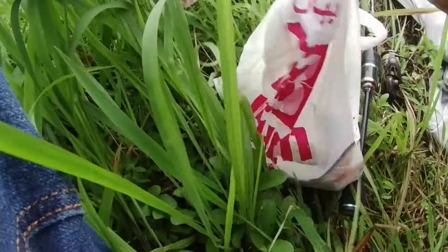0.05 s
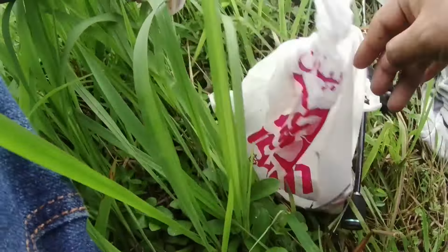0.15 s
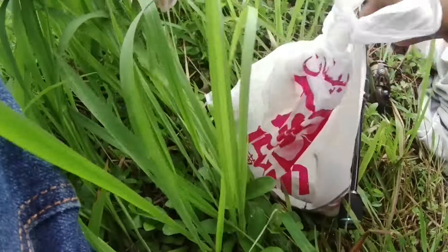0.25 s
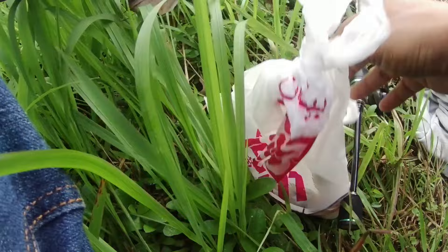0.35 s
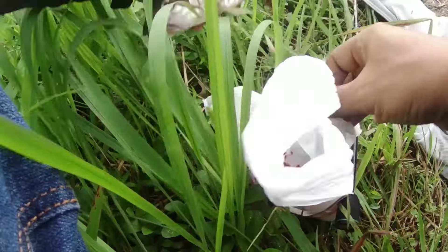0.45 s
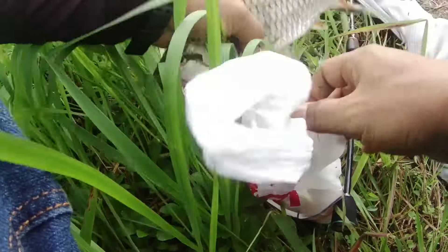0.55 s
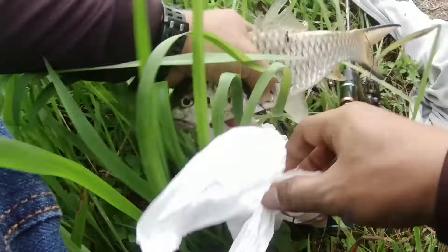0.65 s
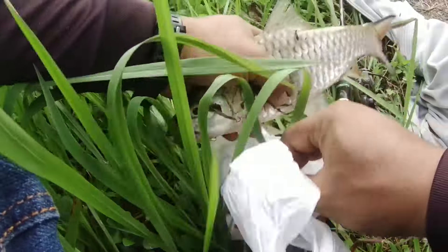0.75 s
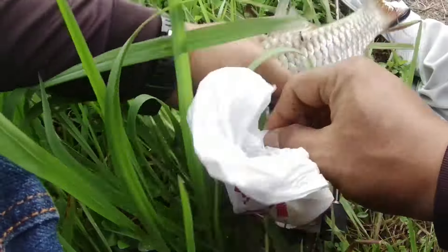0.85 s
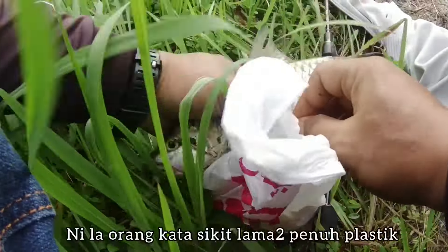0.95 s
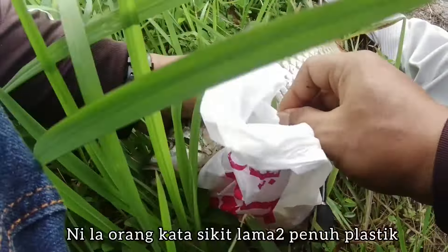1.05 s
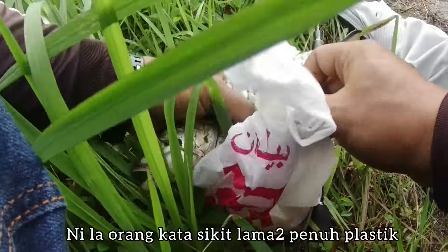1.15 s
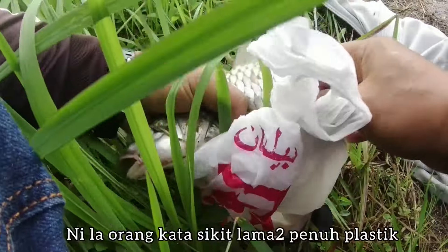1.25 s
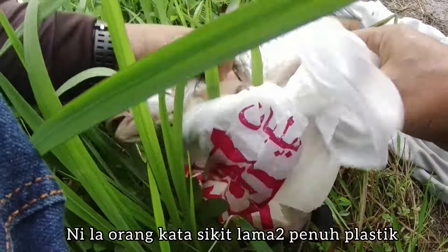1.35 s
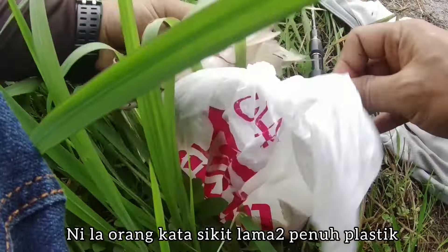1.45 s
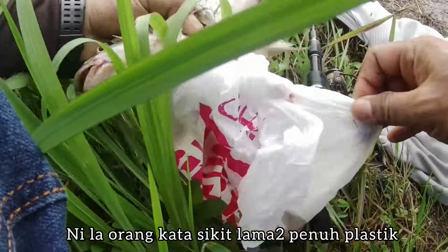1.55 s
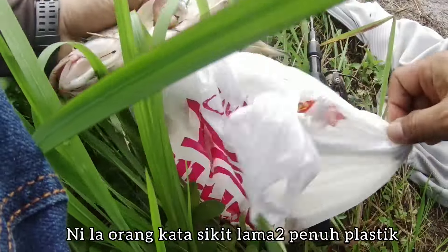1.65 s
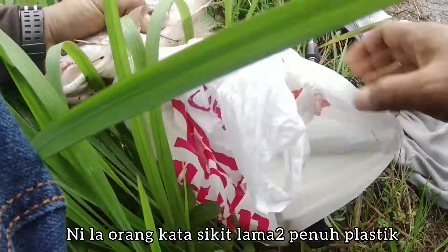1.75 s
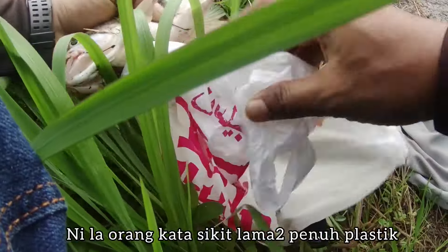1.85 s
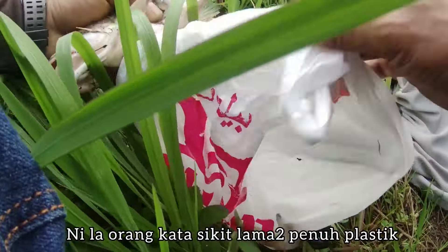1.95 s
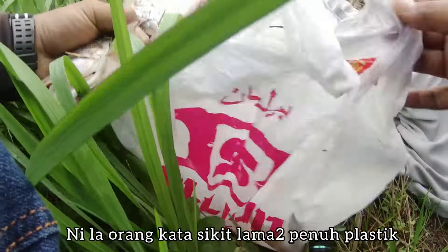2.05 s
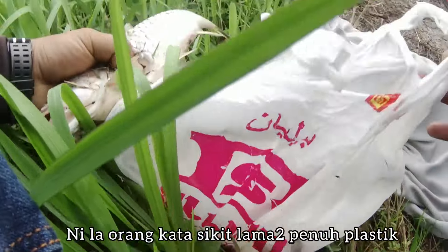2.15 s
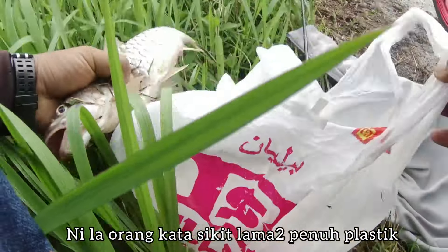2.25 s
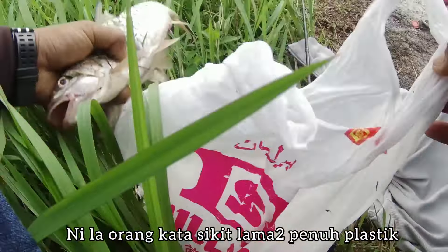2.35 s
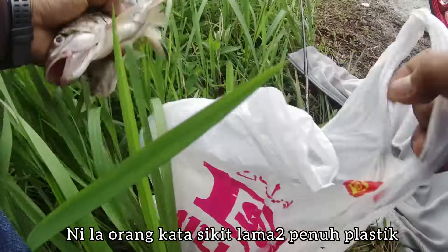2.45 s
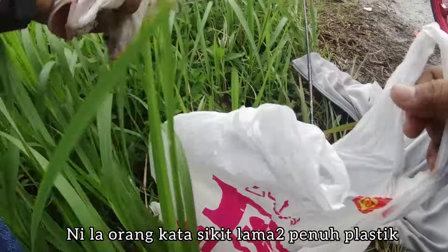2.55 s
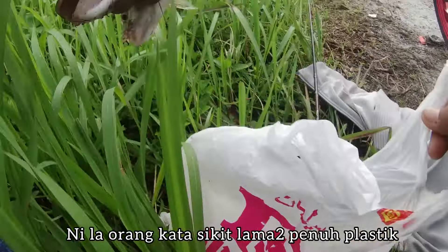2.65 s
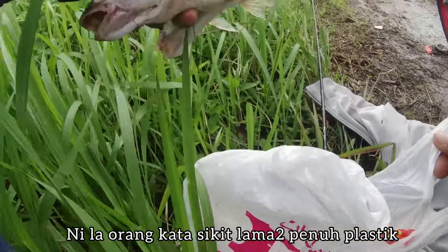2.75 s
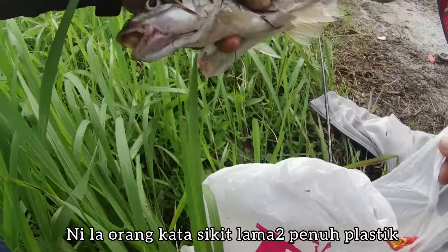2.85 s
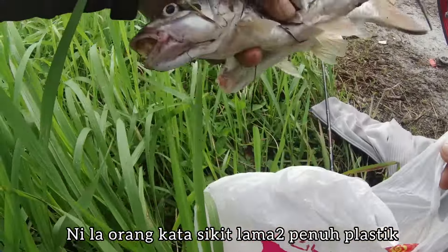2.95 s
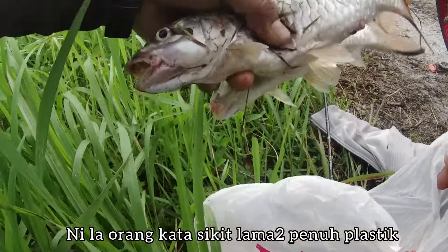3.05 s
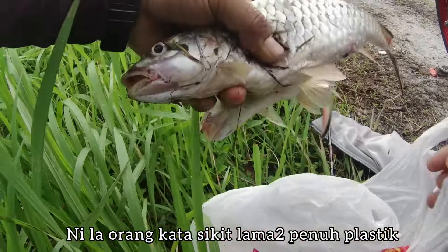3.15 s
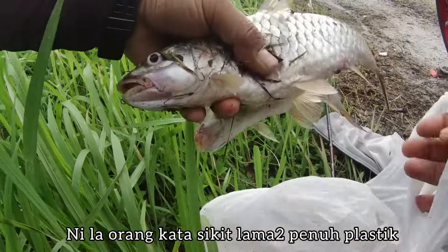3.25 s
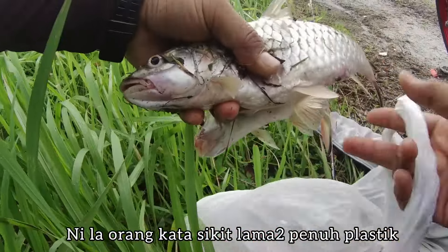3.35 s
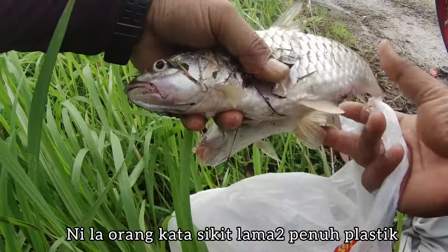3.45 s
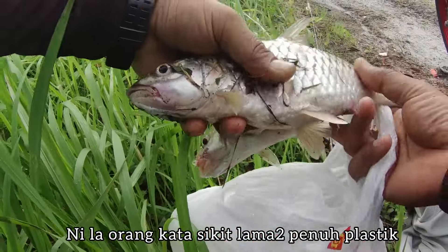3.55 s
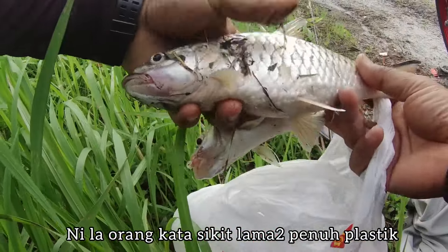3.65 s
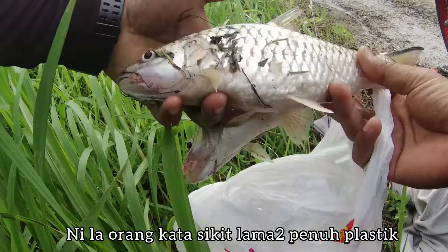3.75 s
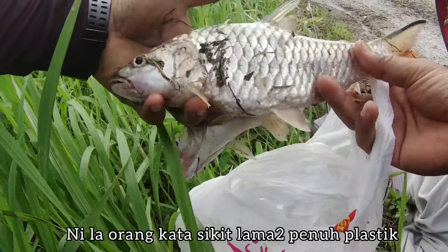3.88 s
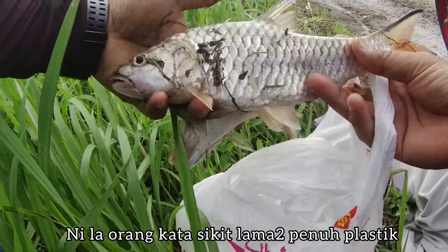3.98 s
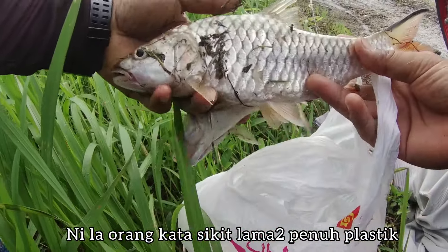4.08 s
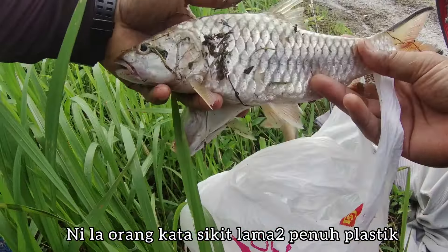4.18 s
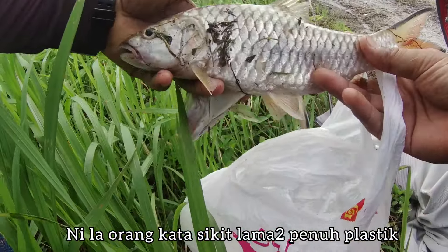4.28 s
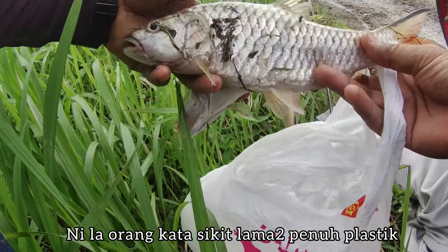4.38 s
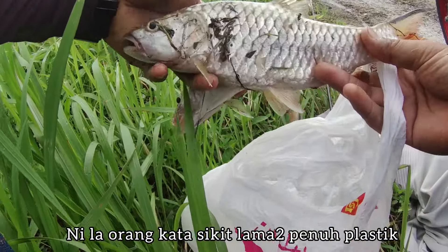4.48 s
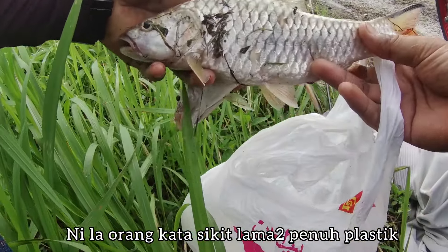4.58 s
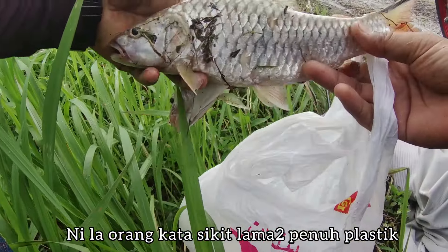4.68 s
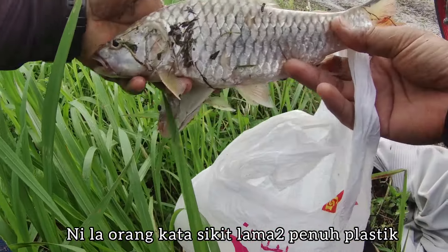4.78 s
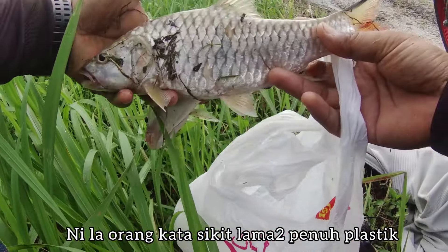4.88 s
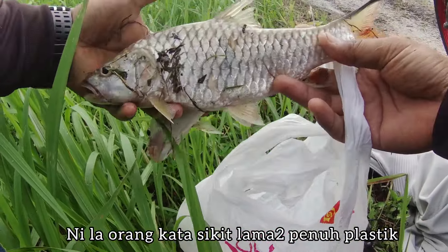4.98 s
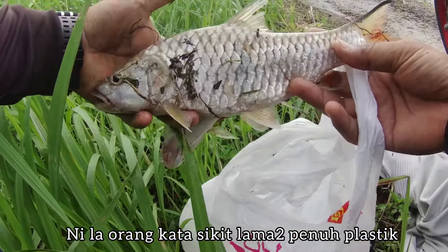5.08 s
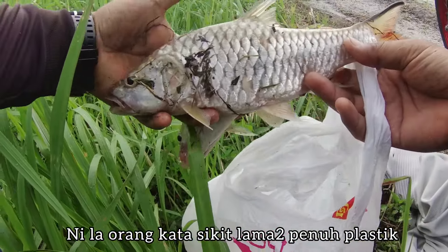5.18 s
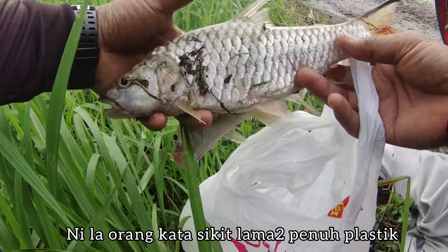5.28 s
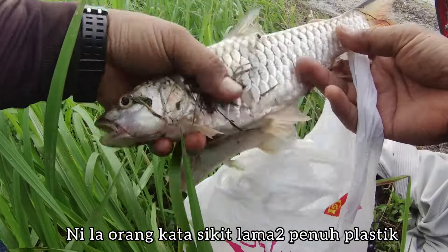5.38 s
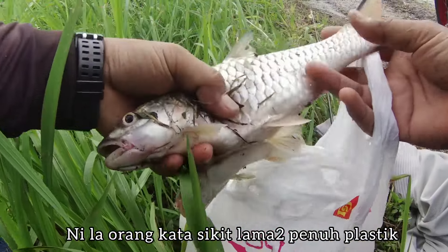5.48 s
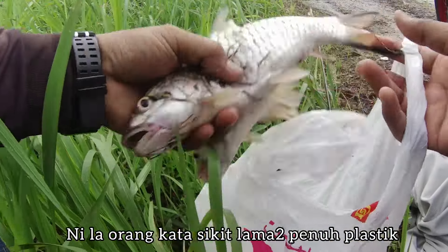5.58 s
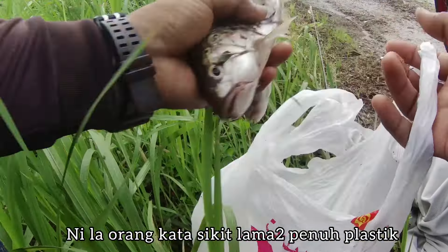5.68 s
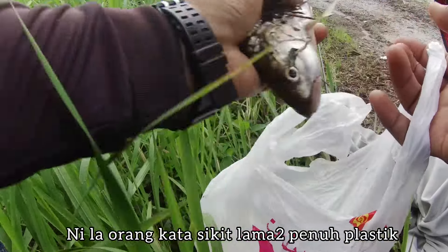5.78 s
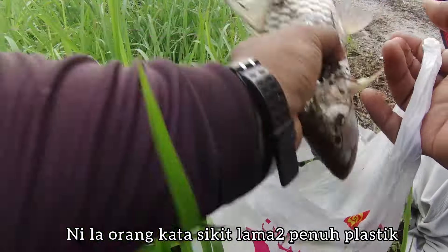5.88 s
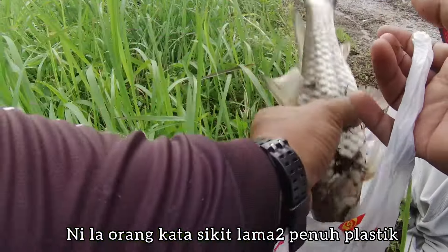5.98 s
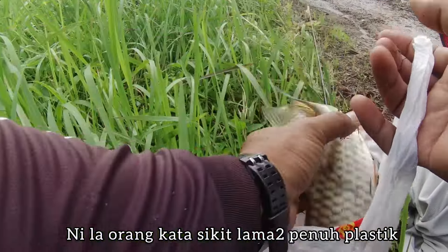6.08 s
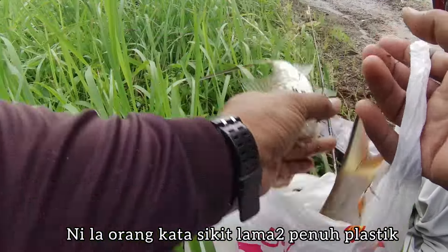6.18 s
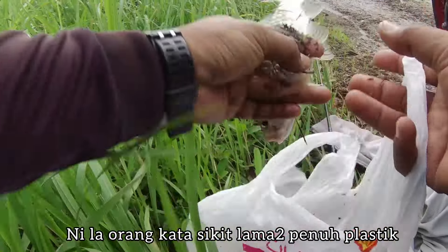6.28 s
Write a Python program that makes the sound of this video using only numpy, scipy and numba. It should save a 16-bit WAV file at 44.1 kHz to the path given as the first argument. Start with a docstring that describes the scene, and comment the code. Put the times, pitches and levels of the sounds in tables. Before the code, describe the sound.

Close bursts of crinkling plastic ease into light crackles outdoors, with a motorbike going by and a faint squeaky bird.

```python
"""A plastic bag in the grass

A thin plastic bag is pulled open and handled close by, then held almost still. Tiny creases
buckle by the thousand, which makes the rustle, and a few snap on their own. Behind it a motorbike
passes with a humming exhaust and roaring tyres, a bird squeaks, and the next vehicle draws near."""
import sys
import numpy as np
from scipy import signal
from scipy.fft import rfft, irfft
from scipy.io import wavfile
from scipy.ndimage import uniform_filter1d
from numba import njit

SR = 44100
rng = np.random.default_rng(int(sys.argv[2]) if len(sys.argv) > 2 else 0)


def master(y):
    """Save y as 16-bit WAV."""
    cut = np.clip(np.atleast_2d(y).T, -1, 1)
    pcm = np.round(cut * 32767)  # scale
    wavfile.write(sys.argv[1], SR, pcm.astype(np.int16))


N = 279108
TIME = np.arange(N) / SR

# tone colour of the crinkling plastic film: f/Hz, level/dB
FILM_COLOUR = [(500, -46), (1100, -34), (1500, -33), (2000, -8.5), (2700, -11.5), (3600, -10.5),
               (4800, -9.5), (6500, -7), (8200, -4.5), (9700, 0.5), (11000, -1.5), (13000, -5.5),
               (14500, -10), (15600, -14)]


def undb(db):
    """Turn decibels into a factor to multiply a sound by."""
    return 10 ** (np.asarray(db) / 20)


def unit(x):
    """Scale a sound to an average power of 1."""
    return x / np.sqrt(np.mean(x ** 2))


def colour(x, points):
    """Give a sound the tone colour drawn by points (f/Hz, level/dB); white noise keeps its power."""
    size = 4096
    hz, db = np.transpose(points)
    log_hz = np.log(np.fft.rfftfreq(size, 1 / SR) + 1)
    log_gain = np.log(undb(np.interp(log_hz, np.log(hz), db)))
    # build the filter so that it rings only after a click, never before it
    cepstrum = irfft(log_gain)[:size // 2]
    cepstrum[1:] *= 2
    response = irfft(np.exp(rfft(cepstrum, size)))
    return signal.fftconvolve(x, response / np.linalg.norm(response))[:N]


def high_pass(x, hz, order):
    """Keep what lies above hz, with no delay, so that the rest of x is its low part."""
    return signal.sosfiltfilt(signal.butter(order, hz, "high", fs=SR, output="sos"), x)


def noise(points):
    """Noise of power 1 with the given tone colour."""
    return unit(colour(rng.standard_normal(N), points))


def band(hz, width_hz):
    """Noise of power 1 around one pitch; its width may change over time."""
    slow = signal.sosfilt(signal.butter(3, 1200, fs=SR, output="sos"), rng.standard_normal((2, N)))
    place = np.cumsum(np.broadcast_to(width_hz, N)) / 2400  # reading faster widens the band
    a, b = (np.interp(place, np.arange(N), part) for part in slow)
    phase = 2 * np.pi * np.cumsum(np.broadcast_to(hz, N)) / SR
    return unit(a * np.cos(phase) + b * np.sin(phase))


def wander(rate):
    """A curve of typical size 1 that glides to a new random value rate times a second."""
    step = max(int(SR / rate), 2)
    held = np.repeat(rng.standard_normal(N // step + 1), step)
    return unit(uniform_filter1d(held, step)[:N])


def add(out, start_s, x):
    """Mix a short sound into out at the given time."""
    i = max(int(start_s * SR), 0)
    out[i:i + len(x)] += x[:max(N - i, 0)]


def field_air(air_db=-65, sway_db=2.0, hum_hz=74.5, hum_db=-90.5):
    """Quiet outdoor air with a faint low hum."""
    # tone colour of still air over the field: f/Hz, level/dB
    air_colour = [(25, -24), (50, -17), (120, -5.5), (300, 1), (900, -5), (1700, 1), (2500, -4),
                  (4000, -7.4), (7000, -9.5), (10000, -6), (15000, -24)]
    hum = np.sin(2 * np.pi * np.cumsum(hum_hz + 1.18 * wander(12)) / SR)
    return undb(air_db + sway_db * wander(3.1)) * noise(air_colour) + undb(hum_db) * unit(hum)


def nearness(peak_s, rise_s, fall_s):
    """A passing sound swells to 1, then fades with distance; the grass soaks up far sound."""
    approaching = TIME < peak_s
    distance = np.hypot(1, (TIME - peak_s) / np.where(approaching, rise_s, fall_s))
    return distance ** -np.where(approaching, 1.65, 1.8)


def traffic(roar_hz=665.6, roar_lead_s=.24, tread_hz=1051.5, tread_reach=.34, wash_db=-65):
    """Passing vehicles: a low drone, a tyre roar that broadens as they near, and tread hiss up close."""
    # vehicles going by: nearest t/s, rise/s, fall/s, drone/dB, tyre roar/dB, tread hiss/dB
    passes = [(3.75, .64, .167, -44.5, -41, -44.5), (6.42, .25, 0.39, -48.5, -43.5, -42)]
    # tone colour of their drone: f/Hz, level/dB
    drone_colour = [(30, -52), (100, -26), (170, -21.5), (290, -10), (400, 0.7), (490, -2.7), (580, -19),
                    (750, -35.5)]
    drone_level = 0
    tyres = undb(wash_db) * band(892, width_hz=486)  # steady traffic further off
    for s, rise_s, fall_s, drone_db, roar_db, tread_db in passes:
        drone_level += undb(drone_db) * nearness(s, rise_s, fall_s)
        near = nearness(s - roar_lead_s, rise_s, fall_s)  # tyres throw their roar ahead
        roar = near * band(roar_hz, width_hz=np.interp(near, [0, 1], [250, 400]))
        tread = nearness(s, tread_reach * rise_s, fall_s) * band(tread_hz, width_hz=530)
        tyres += undb(roar_db) * roar + undb(tread_db) * tread
    # tyres give off almost no bass
    tyres = signal.sosfilt(signal.butter(3, 260, "high", fs=SR, output="sos"), tyres)
    return drone_level * noise(drone_colour) + tyres


def handling(quickest_s=.02, roundness=1.4):
    """How loud the bag's sizzle and its large folds are as each tug swells and dies away."""
    # tugs and squeezes: peak t/s, sizzle/dB, 10 dB rise/s, 10 dB fall/s, folds against sizzle/dB
    tugs = [(.078, -29.5, 0.06, 0.08, -15.5), (.188, -41, 0.16, .14, -10.5), (.332, -40, .14, 0.08, -13.5),
            (.413, -42.5, .03, 0.07, -12.5), (.522, -36.5, -0.01, 0.11, -10.5),
            (.618, -28, 0.05, 0.0452, -11.5), (.798, -31.5, 0.16, 0.0247, -10),
            (.885, -40.5, 0.12, .065, -10.5), (.975, -42, 0.08, .03, -8.5), (1.142, -36, 0.06, 0.05, -12),
            (1.347, -45.5, 0.1, .1, -11), (1.475, -39, .12, 0.01, -11.5), (1.661, -40.5, 0.21, 0.21, -10),
            (1.949, -39, 0.05, 0.11, -12.5), (2.264, -33.5, 0.28, 0.2128, -10.5),
            (2.436, -28.5, 0.0966, 0.03, -11.5), (2.491, -38.5, 0.04, 0.06, -11.5),
            (2.641, -31.5, .025, 0.04, -12), (2.728, -28.5, 0.044, 0.1544, -13),
            (2.85, -29, 0.096, 0.0558, -12), (3.096, -36, 0.11, 0.1822, -11), (3.278, -44.5, 0.15, .08, -7),
            (3.417, -60, 0.17, 0.36, -3), (3.748, -48, 0.05, 0.04, -8), (3.951, -49.5, 0.15, .06, -13.5),
            (4.045, -47.5, 0.05, 0.04, -9), (4.175, -48.5, 0.15, 0.11, -15),
            (4.582, -56.5, 0.18, 0.1, -14.5), (4.729, -52, .045, 0.01, -12), (5.072, -62, 0.26, 0.2, -16),
            (5.359, -48, 0.05, 0.04, -17.5), (5.489, -47, .12, 0.08, -14), (5.707, -63, 0.1, 0.3, -12),
            (6.224, -49, 0.06, .1, -17), (6.329, -47.5, 0.02, .05, -16)]
    sizzle_power, fold_power = 0, 0
    for s, db, rise_s, fall_s, fold_db in tugs:
        # a hand can only start or stop the film so fast
        slope_s = np.maximum(np.where(TIME < s, rise_s, fall_s), quickest_s)
        away = np.minimum(np.abs(TIME - s) / slope_s, 20)
        tug = undb(db - 10 * away ** roundness)  # roundness 1 is a pointed peak, 2 a bell
        sizzle_power += tug ** 2
        fold_power += (tug * undb(fold_db)) ** 2
    return np.sqrt(sizzle_power), np.sqrt(fold_power)


@njit
def tiny_rings(starts, poles, sizes):
    """Each pop rings for a few cycles; its pole turns and shrinks it a little every sample."""
    out = np.zeros(N)
    for k in range(len(starts)):
        ring = sizes[k]
        for i in range(starts[k], min(starts[k] + 120, N)):
            out[i] += ring.real
            ring *= poles[k]
    return out


def film_shake(pops, tail_db, decay_s=0.0071):
    """Each pop shakes the film around it, which leaves a short hissing tail."""
    decay = np.exp(-1 / (decay_s * SR))
    tail_level = np.sqrt(signal.lfilter([1 - decay], [1, -decay], pops ** 2))
    return pops + undb(tail_db) * tail_level * rng.standard_normal(N)


def crease_pops(effort, idle_per_s=400, busy_per_s=15000, ring_s=0.00012, clump_db=0.76, bounce=0.26):
    """Creases buckle in little bursts; harder handling sets off more of them."""
    pops_per_s = idle_per_s + busy_per_s * effort ** .75
    starts = np.flatnonzero(rng.random(N) < pops_per_s / SR)
    # every flat patch of film has its own size, so its own pitch
    pitch, length, smallness, turn = rng.random((len(starts), 4)).T
    poles = np.exp(1j * np.pi * pitch - 1 / (ring_s * (.5 + length) * SR))
    sizes = undb(-2.0 * np.log(smallness + 0.02))  # most pops are small, a few are large
    pops = tiny_rings(starts, poles, sizes * np.exp(2j * np.pi * turn))
    pops = film_shake(pops, tail_db=-2.0) * undb(clump_db * wander(170))
    pops /= np.sqrt(uniform_filter1d(pops ** 2, size=1800) + 1e-12)  # even out the loudness
    # the sound also bounces off the ground, whose distance keeps changing as the bag moves
    delay_s = 0.000401 * np.exp(0.383 * wander(5))
    return pops + bounce * np.interp(TIME - delay_s, TIME, pops)


def bag_rustle(crumple_db=-25, crumple_growth=0.34, catch_db=1.63):
    """Small patches of film give the sizzle, folds the middle, and the whole sheet the low crumple."""
    sizzle_level, fold_level = handling()
    effort = sizzle_level / sizzle_level.max()
    pops = crease_pops(effort)
    film = high_pass(colour(pops, FILM_COLOUR), 2300, order=6)
    sizzle = high_pass(film, 5700, order=3)
    # tone colour of the whole sheet crumpling: f/Hz, level/dB
    crumple_colour = [(500, -17), (1100, -9.5), (1500, 2), (2200, -2), (2700, -15), (4000, -35.5)]
    crumple = colour(film_shake(pops, tail_db=7.5), crumple_colour)
    # the whole sheet joins in more when it is pulled hard
    crumple_level = sizzle_level * undb(crumple_db) * effort ** crumple_growth
    bag = sizzle_level * unit(sizzle) + fold_level * unit(film - sizzle) + crumple_level * unit(crumple)
    # the film catches and gives within each tug, most of all under a light touch
    return undb(catch_db * (1 - effort) ** 2 * wander(55)) * bag


def crease_snaps(ring_s=0.0014, crack=0.84, gain_db=-3):
    """A tight crease flips: a sharp crack with a very short ring."""
    # single creases that snap: t/s, peak level before gain_db/dB, ring f/Hz
    snaps = [(0.0794, -12.5, 9900), (0.242, -27, 8360), (0.5616, -20, 10000), (0.8989, -23, 11100),
             (1.468, -27, 9500), (1.548, -29, 10550), (2.4009, -15, 9320), (2.493, -22, 10600),
             (3.0752, -28, 10690), (3.3129, -23, 7600), (3.678, -35, 7220), (3.7353, -28.5, 4200),
             (3.8099, -35, 9350), (3.92, -32, 9430), (4.0467, -31, 9400), (4.3249, -37, 10900),
             (4.503, -37, 11170), (4.568, -33, 11900), (4.6467, -36, 11110), (4.9272, -42, 7600),
             (5.0385, -35, 7500), (5.0732, -40, 6560), (5.312, -34, 7960), (6.2068, -33, 10420),
             (6.222, -29, 10140)]
    out, t = np.zeros(N), TIME[:400]
    for s, db, hz in snaps:
        pop = np.sin(2 * np.pi * hz * t) + crack * rng.standard_normal(len(t))
        pop = colour(pop * np.exp(-t / ring_s), FILM_COLOUR)
        add(out, s, undb(db + gain_db) * pop / np.abs(pop).max())
    return out


def far_swells():
    """Faint narrow bands of noise that rise and fade in the distance."""
    # distant swells: peak t/s, length/s, centre f/Hz, width/Hz, level/dB
    swells = [(.13, 0.46, 1220, 440, -57.3), (0.64, 0.45, 630.7, 249.8, -52.5),
              (0.683, .32, 1065, 184.6, -52.5), (1.16, 1.2, 716, 150, -56.5),
              (1.52, 0.39, 1152, 260.2, -61.5), (2.803, 1.32, 785.2, 180, -49.5),
              (4.48, 0.19, 1096, 120.5, -61), (4.914, 0.24, 1666, 170, -63), (5.2, 0.91, 1724, 380, -69.5),
              (5.772, 0.32, 1447, 451, -60), (5.98, 0.24, 1014, 149.8, -56), (5.52, .73, 3270, 260, -74)]
    return sum(undb(db) * band(hz, width_hz) * np.exp(-(2 * (TIME - s) / length_s) ** 2)
               for s, length_s, hz, width_hz, db in swells)


def wavering_tone(hz, waver, second_db, third_db):
    """A tone with overtones at two and three times its pitch, which strays by the fraction waver."""
    phase = 2 * np.pi * np.cumsum(hz * (1 + waver)) / SR
    return np.sin(phase) + undb(second_db) * np.sin(2 * phase) + undb(third_db) * np.sin(3 * phase)


def motorbike_exhaust(pass_s=3.685, pitch_hz=374.7, doppler_hz=21, note_db=-33, rasp_db=-53.5):
    """The note drops as the bike goes by (the Doppler effect) and wavers on its way across the field."""
    hz = pitch_hz - doppler_hz * np.tanh((TIME - pass_s) / .25)
    tone = unit(wavering_tone(hz, 0.0099 * wander(50), second_db=-26, third_db=-21))
    shade_db = 10 * np.maximum(TIME - pass_s, 0)  # once past, the note fades further and further as the grass soaks it up
    flutter_db = wander(35)
    note = tone * undb(note_db - shade_db + flutter_db) * nearness(pass_s, rise_s=0.076, fall_s=0.094)
    # a rasp is heard just before the bike arrives
    rasp = nearness(peak_s=3.16, rise_s=0.54, fall_s=0.34) * band(2002, width_hz=1400)
    return note + undb(rasp_db) * rasp


def bird(waver=0.012, echo_s=0.3, echo_db=-2.5):
    """Thin squeaky notes that flip between a high and a low voice and echo off the bank."""
    # bird notes: t/s, length/s, f/Hz, level/dB, overtone at twice the pitch against the note/dB
    chirps = [(3.702, .013, 4140, -51.5, -20), (3.734, 0.028, 4215, -51.5, -20),
              (4.146, .025, 2235, -60, -7), (4.168, 0.028, 1924, -57, 3.5),
              (4.182, 0.032, 1917, -49.5, -14), (4.206, .04, 3910, -47, -4), (4.269, 0.064, 3970, -60, -1),
              (4.85, 0.039, 3806, -56, -9), (4.883, 0.076, 3810, -64, -12)]
    notes, wobble = np.zeros(N), wander(600)
    for s, length_s, hz, db, second_db in chirps:
        start, n = int(s * SR), int(length_s * SR)
        note = wavering_tone(hz, waver * wobble[start:start + n], second_db, third_db=-22)
        add(notes, s, undb(db) * np.sqrt(2) * note * signal.windows.tukey(n, .8))
    # many small echoes blur into a tail that fades by 60 dB in echo_s
    t = TIME[:SR // 2]
    tail = rng.standard_normal(len(t)) * undb(-60 * t / echo_s)
    return notes + undb(echo_db) * signal.fftconvolve(notes, tail / np.linalg.norm(tail))[:N]


def scene():
    """The bag up close and everything else behind it, in one channel."""
    bag = bag_rustle() + crease_snaps()
    return (bag + traffic() + motorbike_exhaust() + bird() + far_swells() + field_air())[None]


def record(dry):
    """The phone cuts off the highest treble."""
    top_hz = 15650
    return signal.sosfilt(signal.ellip(12, .2, 80, top_hz, fs=SR, output="sos"), dry)


dry = scene()
out = record(dry)
master(out)
```